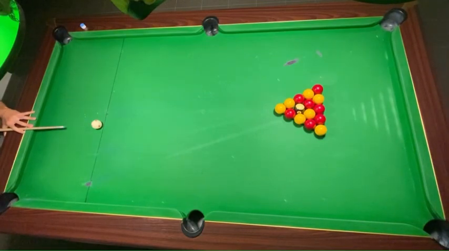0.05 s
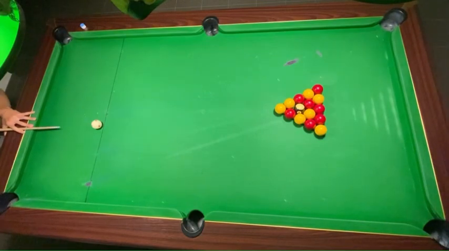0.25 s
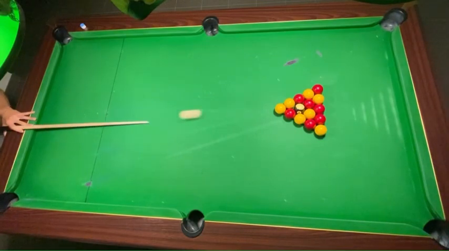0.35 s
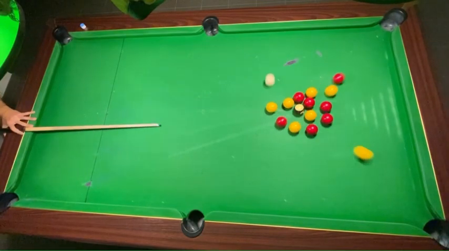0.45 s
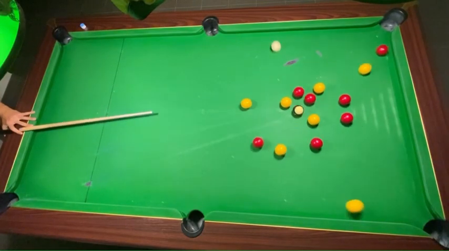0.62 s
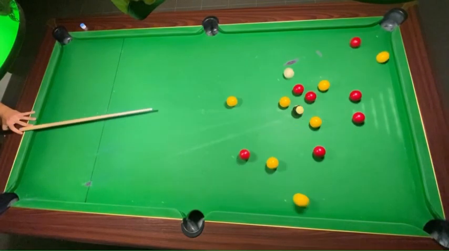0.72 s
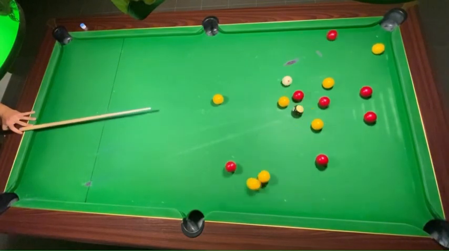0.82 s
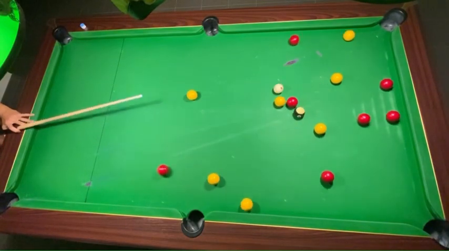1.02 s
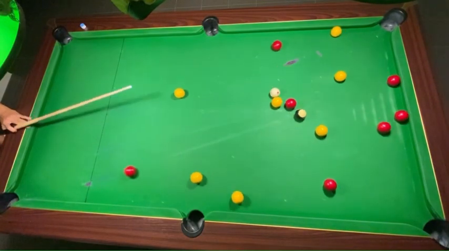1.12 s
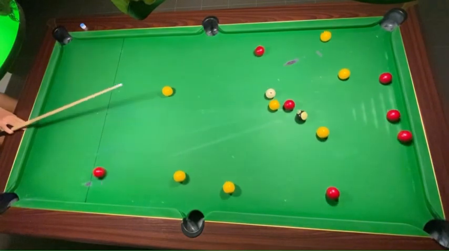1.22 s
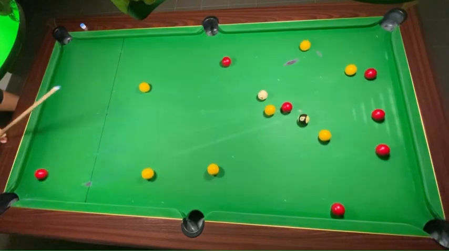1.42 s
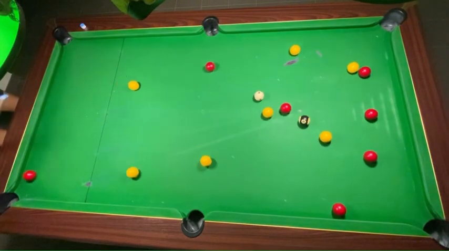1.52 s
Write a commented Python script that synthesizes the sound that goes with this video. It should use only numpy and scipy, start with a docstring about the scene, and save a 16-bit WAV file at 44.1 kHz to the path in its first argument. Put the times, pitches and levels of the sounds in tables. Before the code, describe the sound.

Pool balls break with a sharp crack, then click and roll across the table.

```python
"""A reverberant room with a pool table, where a player breaks the rack.
The lunge sets low modes thumping; the cue tip then cracks against the cue ball and its wood rings.
The ball smashes into the rack, and the balls scatter: hard, brief contacts make bright clicks, soft
contacts with the cushions make dull bumps, and rolling rumbles over the slate. Every blow excites
the room's diffuse field, which dies away band by band above a faint hiss and the quiet room tone."""
import sys
import numpy as np
from scipy import signal
from scipy.fft import rfft, irfft
from scipy.io import wavfile

SR = 44100
rng = np.random.default_rng(int(sys.argv[2]) if len(sys.argv) > 2 else 0)


def unload_audio(sound):
    """Save the sound as a 16-bit wav file, at the path given as the first command line argument."""
    columns = np.transpose(np.atleast_2d(sound))
    # keep every value between -1 and 1, then stretch to whole-number steps
    steps = np.round(np.clip(columns, -1, 1) * 32767)
    wavfile.write(sys.argv[1], SR, steps.astype(np.int16))


N = 68355
TIME = np.arange(N) / SR
BANDS = np.geomspace(32, 16500, 30)   # band centres, f/Hz


def from_db(db):
    """Amplitude ratio: tenfold for every 20 dB."""
    return 10 ** (np.asarray(db) / 20)


def per_band(rows):
    """Interpolation of a table's columns over log frequency, at the band centres."""
    hz, *columns = np.transpose(rows)
    return [np.interp(np.log(BANDS), np.log(hz), column) for column in columns]


def butter(x, hz, kind, order=2):
    """Causal Butterworth filter: a maximally flat passband."""
    sections = signal.butter(order, np.clip(hz, 10, .45 * SR), kind, fs=SR, output="sos")
    return signal.sosfilt(sections, x + 1e-18)


def impulses(times, gains):
    """Ideal impacts: one sample for each blow."""
    samples = np.clip(np.round(np.atleast_1d(times) * SR).astype(int), 0, N - 1)
    return np.bincount(samples, np.atleast_1d(gains), N)


def delayed(x, lag_s):
    """Propagation delay, interpolated between samples."""
    return np.interp(TIME - lag_s, TIME, x)


def ring(x, hz, t60):
    """Damped oscillator: an impulse starts a sine that falls 60 dB in t60 seconds."""
    radius, angle = np.exp(-np.log(1000) / (t60 * SR)), 2 * np.pi * hz / SR
    return signal.lfilter([0, np.sin(angle)], [1, -2 * radius * np.cos(angle), radius ** 2], x + 1e-18)


def struck(modes, times, db):
    """Modal superposition: every blow excites all the modes."""
    return sum(ring(impulses(times, from_db(db + level)), hz, t60) for hz, level, t60 in modes)


def room_ring(modes, times, db):
    """Modes heard in a room: each blow reaches each ear in a random phase."""
    out = np.zeros((2, N))
    for hz, level, t60 in modes:
        for ear in range(2):
            out[ear] += struck([(hz, level, t60)], times + rng.random(len(times)) / hz, db)
    return out


def diffuse_field(top_hz=13600):
    """Diffuse sound: third-octave noise bands, partly coherent between the ears."""
    # the field at the ears: f/Hz, left-right correlation, left minus right level/dB
    stereo = [(60, 0.86, -6.5), (132, 1, 3.5), (260, 0.24, -1), (1000, -0.25, -1.5), (2200, 0, 0),
              (4350, 0.053, -4.5), (8500, 0.0096, -5), (11900, 0.795, 3)]
    spectrum = rfft(butter(rng.standard_normal((2, N)), top_hz, "low", order=12))
    hz = np.arange(N // 2 + 1) * SR / N
    ears, bands = np.array([[1], [-1]]), []
    for weights, alike, lean_db in zip(np.eye(len(BANDS)), *per_band(stereo)):
        mid, side = irfft(spectrum * np.interp(hz, BANDS, weights, left=0, right=0), N)
        pair = np.sqrt((1 + alike) / 2) * mid + np.sqrt((1 - alike) / 2) * side * ears
        bands.append(pair * from_db(ears * lean_db / 2))
    return np.array(bands)


def reverberate(field, wash, times, db, bright_hz=np.inf, build_up_s=0.002):
    """Reverberation: the energy of each blow builds up, then decays exponentially in each band."""
    out, rise = 0, np.exp(-1 / (build_up_s * SR))
    for noise, hz, level, t60 in zip(field, BANDS, *per_band(wash)):
        fed = impulses(times, from_db(db + level) ** 2 / (1 + (hz / bright_hz) ** 4))
        decay = np.exp(-2 * np.log(1000) / (max(t60, .005) * SR))
        energy = signal.lfilter([1 - rise], np.poly([rise, decay]), fed)
        out = out + noise * np.sqrt(energy)
    return out


def coloured_noise(field, colour, curve=((0, 0),)):
    """Spectral shaping: weighted noise bands follow one level curve."""
    envelope = from_db(np.interp(TIME, *np.transpose(curve)))
    return np.tensordot(from_db(per_band(colour)[0]), field, 1) * envelope


def soft_blows(field, rows, modes, wash, contact_hz=315, boom_hz=70.4, boom_rise_s=0.029):
    """A long contact acts as a low-pass: low modes ring, a boom swells and the room answers."""
    times, db, boom_db, *bright_hz = np.transpose(rows)
    body = butter(struck(modes, times, db), contact_hz, "low")
    age = TIME / boom_rise_s
    swell = (age * np.exp(1 - age)) ** 2 * np.sin(2 * np.pi * boom_hz * TIME)
    boom = signal.fftconvolve(impulses(times, from_db(boom_db)), swell)[:N]
    direct = butter(body, 95, "high") + boom
    return direct * from_db([[.8], [-.8]]) + reverberate(field, wash, times, db, *bright_hz)


def room_tone(field):
    """Stationary noise: the quiet room, strongest in the bass."""
    # background spectrum: f/Hz, level/dB
    colour = [(35, -70), (80, -47), (200, -59.5), (450, -70), (1200, -62), (3000, -75.5), (8000, -82.5),
              (14000, -77)]
    return coloured_noise(field, colour)


def hiss(field):
    """Amplitude-modulated noise: a faint treble hiss swells and dips."""
    # hiss spectrum: f/Hz, level/dB
    colour = [(500, -99), (1500, -53), (3500, -59.5), (6000, -57), (10000, -63), (13000, -64.5),
              (16000, -79)]
    # hiss envelope: t/s, level/dB
    curve = [(0, -14), (0.186, -8), (0.197, 2), (.3, 7), (.45, 2.5), (.72, -30.5), (.9, -1), (1.091, -10),
             (1.13, -5), (1.42, 0), (1.55, -5)]
    return coloured_noise(field, colour, curve)


def lunge(field):
    """Impact excitation: the player's lunge sets low, damped modes thumping."""
    # thumps: t/s, level/dB, boom level/dB
    thumps = [(.196, -28.5, -55), (0.2012, -15, -39), (.2162, -13.5, -33.5), (0.249, -44.5, -23.5),
              (.269, -23.5, -60), (.287, -17.5, -31), (.32, -35.5, -23), (0.373, -34.5, -33.5)]
    # their resonances: f/Hz, level/dB, T60/s
    modes = [(152.5, -7.5, 0.21), (205.8, 2.5, 0.14), (294.4, -11.5, .06), (352.8, -13, 0.2),
             (506.8, -17, 0.36), (726.6, -12, 0.49)]
    # their reverberation: f/Hz, level/dB, T60/s
    wash = [(35, -14, .4), (70, 8, 0.32), (176, 10, 0.402), (298, -1.5, 0.946), (700, -6, 0.52),
            (920, -11, 0.99), (1300, -24.5, 0.86), (2530, -38, 0.79), (6000, -63, 0.59)]
    return soft_blows(field, thumps, modes, wash)


def cue(field, ring_db=-25.5, right_lag_s=0.000273, room_lag_s=0.0021):
    """Free vibration after impact: the tip knocks, the wood rings and a broad crack fills the room."""
    # stroke of the tip: t/s, level/dB
    stroke = [(0.3048, -1)]
    # heavily damped modes of the knock: f/Hz, level/dB, T60/s
    knock_modes = [(590, -8.5, .012), (1200, -1.5, 0.00506)]
    # modes of the wooden cue: f/Hz, level/dB, T60/s
    wood_modes = [(506, -2, 0.6), (623.2, 2, 0.43), (728, -2, 0.43), (929, -1, 0.36), (987, 1, 0.58),
                  (1296, 1, 0.278), (1400, -3, 0.45), (1540, 3, 0.24), (1670, 2.5, .25), (2863, -4, 0.59),
                  (2830, -11, 0.35)]
    # reverberation of the crack: f/Hz, level/dB, T60/s
    wash = [(60, -26.5, 0.62), (177, 11, 0.15), (328, -15.5, 0.316), (646, 3, 0.52), (1310, -3, 0.79),
            (2300, -11, 1), (2700, -5.5, 1), (4170, -13.5, 0.942), (7700, -14, 0.305), (11390, -27, 0.352),
            (15300, -35, 0.47)]
    times, db = np.transpose(stroke)
    knock = butter(struck(knock_modes, times, db), 390, "high")
    direct = np.array([knock, delayed(knock, right_lag_s)])
    wood = room_ring(wood_modes, times, db + ring_db)
    return direct + wood + reverberate(field, wash, times + room_lag_s, db)


def ticks(field, hz=12585, t60=0.0017, left_lag_s=.000018):
    """Onset transients: the cleanest contacts open with a high, brief ring that scatters into a sheen."""
    # clean contacts: t/s, tick level/dB, sheen level/dB
    contacts = [(0.4157, -6, -35), (0.763, -38, -35), (.7769, -35, -33.5), (0.8743, -26.5, -34.5),
                (1.524, -49.5, -60)]
    # first scatter off the table: f/Hz, level/dB, T60/s
    scatter = [(3000, -58, .02), (5600, -7, 0.013), (9000, -25, 0.0069), (13100, -13, 0.0096),
               (16000, -11, 0.016)]
    # sheen in the room: f/Hz, level/dB, T60/s
    sheen = [(3000, -35.5, 0.346), (5400, -29, 0.46), (6900, -19.5, 0.42), (9900, -25.5, 0.28),
             (12900, -21, 0.36), (16000, -30, 0.32)]
    times, db, sheen_db = np.transpose(contacts)
    tick = butter(ring(impulses(times, from_db(db)), hz, t60), 8000, "high")
    direct = np.array([delayed(tick, left_lag_s), tick])
    return direct + reverberate(field, scatter, times, db) + reverberate(field, sheen, times, sheen_db)


def ball_clacks(field, click_band_hz=(1644, 3170), left_lag_s=.00009, early_lag_s=0.0074):
    """Elastic collisions: a shorter contact pulse clicks brighter; echoes and reverberation follow."""
    # ball meets ball: t/s, click level/dB, room level/dB, cutoff f/Hz
    clacks = [(0.4162, 13, -0.5, 6070), (0.4558, -2.5, -25, 3400), (0.491, -2.5, -8.5, 3640),
              (0.6547, -17, -14, 3170), (0.7235, -23, -15.5, 3300), (0.7625, -8, -17.5, 3600),
              (0.7721, -5.5, -10, 4080), (0.8314, -24, -15.5, 3245), (0.8746, -0.5, -11, 3750),
              (0.8849, -4.5, -17, 3600), (0.944, -9.5, -18.5, 3120), (1.1237, -18, -26.5, 2700),
              (1.5233, -18.5, -22.5, 2470)]
    # reflections off near surfaces: left delay t/s, right delay t/s, level/dB
    reflections = [(.0021, 0.002223, -4.5), (.0039, 0.0037, -4), (.007, .0067, -5.5), (.0099, 0.0095, -1),
                   (0.0105, .0112, -7), (0.0161, 0.0143, -9)]
    # dense early reflections: f/Hz, level/dB, T60/s
    early_wash = [(497, -18.5, 0.05), (1220, -25, 0.027), (1980, -11.5, 0.018), (2930, -19.5, 0.018),
                  (4050, -17, 0.039), (6915, -53, .04), (14000, -53, .04)]
    # reverberant tail: f/Hz, level/dB, T60/s
    late_wash = [(200, -32, 1), (453, -28.5, 0.55), (774, -16.5, 0.691), (1254, -12, 0.97),
                 (2030, -6.5, 0.961), (2878, -4, 0.81), (3977, -16.5, 0.69), (5500, -34.5, 0.76),
                 (7776, -47, 1), (14000, -47, .4)]
    # resonances that stand out in the tail: f/Hz, level/dB, T60/s
    modes = [(2051.3, -32, 0.86), (2512, -33.5, 0.71), (3074, -31.5, 0.76)]
    times, db, room_db, bright_hz = np.transpose(clacks)
    pulses = sum(butter(impulses(at, from_db(level + 10.5)), hz, "low")
                 for at, level, hz in zip(times, db, bright_hz))
    click = butter(pulses, click_band_hz, "band", order=3)
    edge = ring(pulses, hz=4363, t60=0.0089)   # heard on the straight path only
    sharp_click = from_db(-10) * click + from_db(-23) * edge
    direct = np.array([delayed(sharp_click, left_lag_s), sharp_click])
    echoes = sum(from_db(level) * np.array([delayed(click, lag) for lag in lags])
                 for *lags, level in reflections)
    early = reverberate(field, early_wash, times + early_lag_s, room_db, bright_hz)
    tail = reverberate(field, late_wash, times, room_db, bright_hz)
    return direct + echoes + early + tail + room_ring(modes, times, room_db)


def cushion_bumps(field):
    """Compliant impact: the cushions yield to the balls, so the table's low modes ring."""
    # ball meets cushion: t/s, knock level/dB, boom level/dB, reverberation cutoff f/Hz
    bumps = [(0.508, -37, -41, 900), (0.563, -33, -37.5, 400), (0.588, -32, -49, 704),
             (0.611, -28.5, -29.5, 1500), (0.719, -35, -37.5, 1500), (0.781, -37.5, -41, 500),
             (0.899, -44.5, -49, 259), (0.936, -62, -32, 250), (1.067, -37, -43.5, 262),
             (1.085, -40.5, -34.5, 302), (1.159, -42, -43.5, 283), (1.271, -38, -39, 680),
             (1.306, -45.5, -44.5, 495), (1.408, -100.5, -44, 300), (1.498, -45.5, -62.5, 2530),
             (1.506, -39.5, -55.5, 810), (1.522, -31.5, -39, 283)]
    # modes of the table: f/Hz, level/dB, T60/s
    modes = [(145, -13, 0.142), (188, -10.5, 0.12), (243.9, -2, 0.076), (507, -15.5, 0.089)]
    # reverberation of a bump: f/Hz, level/dB, T60/s
    wash = [(99, 7.5, 0.21), (202, 17, 0.25), (356.4, 4, 0.67), (628, 10.5, 0.476), (1240, 3.5, 0.39),
            (2220, -1.5, 0.36), (5000, -51, 0.36)]
    return soft_blows(field, bumps, modes, wash)


def rolling(field):
    """Rolling noise: the balls rumble over the slate, swelling after the break."""
    # rumble spectrum: f/Hz, level/dB
    colour = [(35, -56.5), (70, -19.5), (110, -21.5), (170, -23.5), (260, -34), (380, -50), (700, -44),
              (1500, -79), (4000, -80)]
    # rumble envelope: t/s, level/dB
    curve = [(0, -49.5), (.3, -62), (.45, -14), (.65, 0), (.9, -3), (1.2, -3), (1.4, -8), (1.55, -14)]
    return coloured_noise(field, colour, curve)


def scene():
    """Superposition: all the sources add, drawing on three independent noise fields."""
    field_a, field_b, field_c = diffuse_field(), diffuse_field(), diffuse_field()
    background = room_tone(field_b) + hiss(field_c)
    shot = lunge(field_c) + cue(field_a)
    balls = ticks(field_c) + ball_clacks(field_b) + cushion_bumps(field_a) + rolling(field_c)
    return background + shot + balls


def record(dry, ceiling=.95, cutoff_hz=16500):
    """Soft saturation rounds the highest peaks; a steep low-pass cuts the top."""
    rounded = dry / (1 + (dry / ceiling) ** 8) ** .125
    return signal.sosfilt(signal.cheby2(12, 60, cutoff_hz, fs=SR, output="sos"), rounded)


dry = scene()
out = record(dry)
unload_audio(out)
```